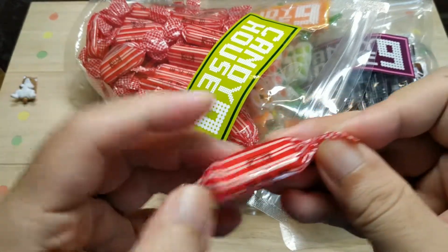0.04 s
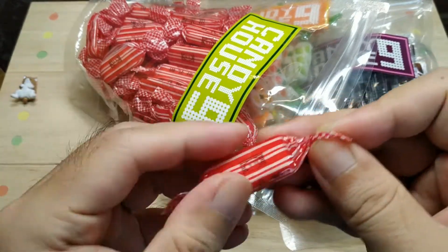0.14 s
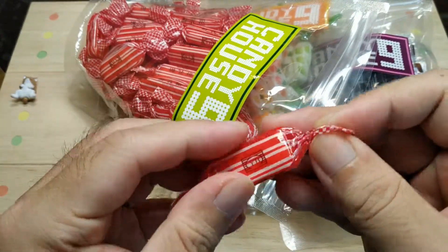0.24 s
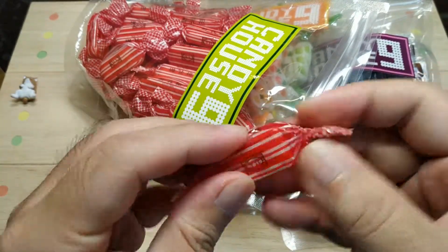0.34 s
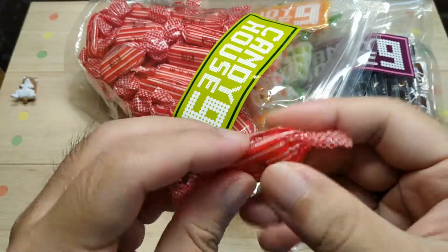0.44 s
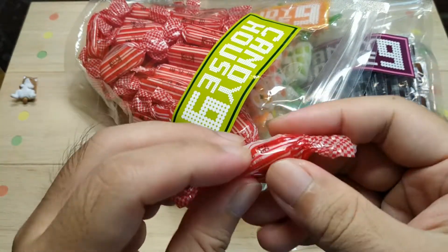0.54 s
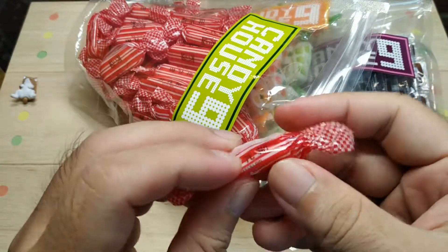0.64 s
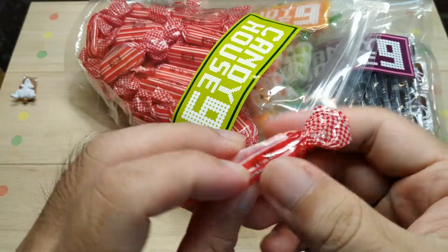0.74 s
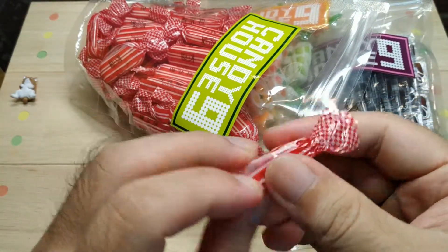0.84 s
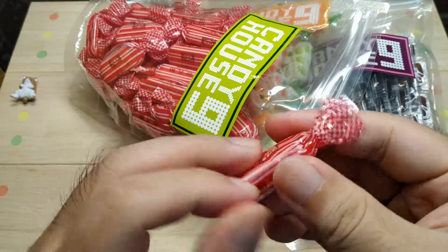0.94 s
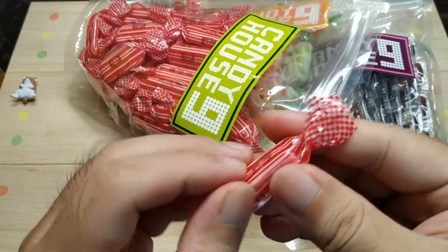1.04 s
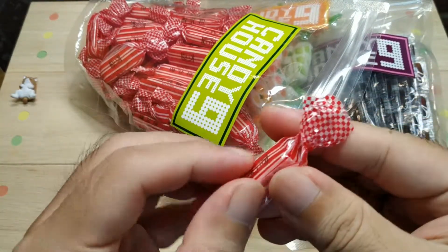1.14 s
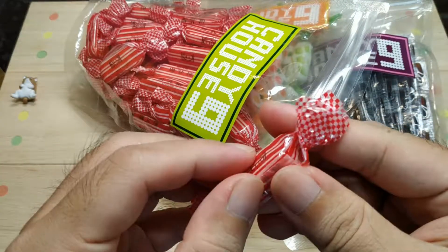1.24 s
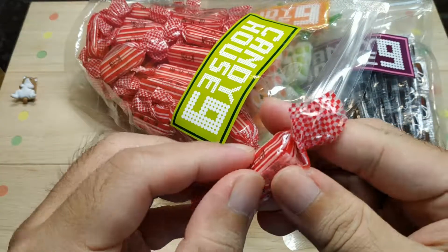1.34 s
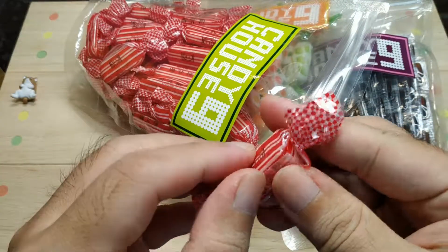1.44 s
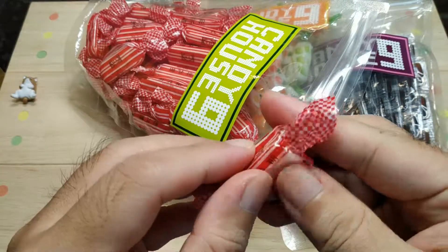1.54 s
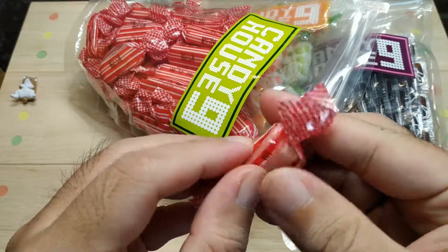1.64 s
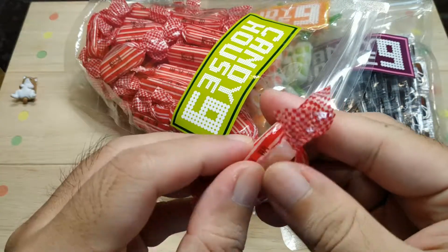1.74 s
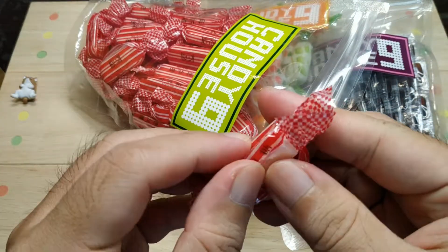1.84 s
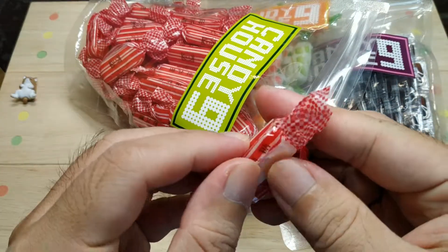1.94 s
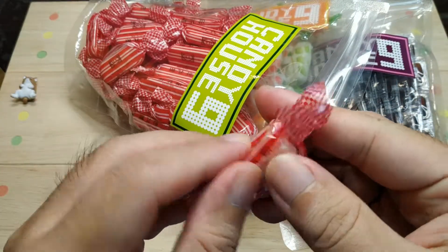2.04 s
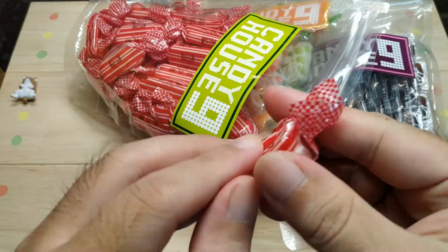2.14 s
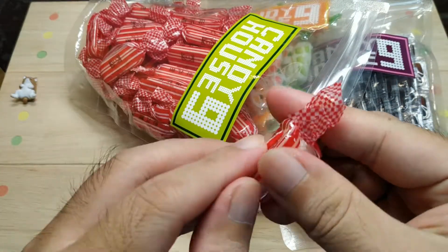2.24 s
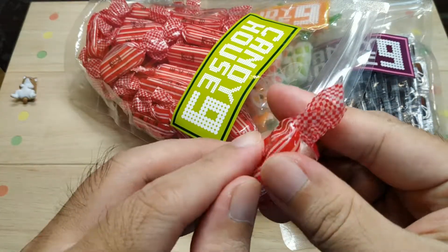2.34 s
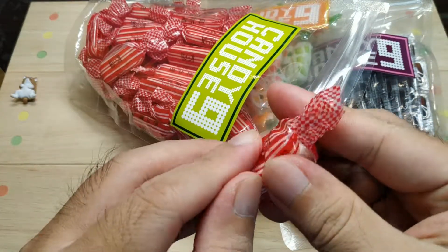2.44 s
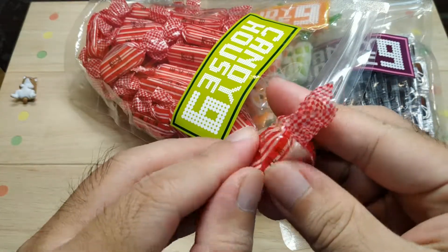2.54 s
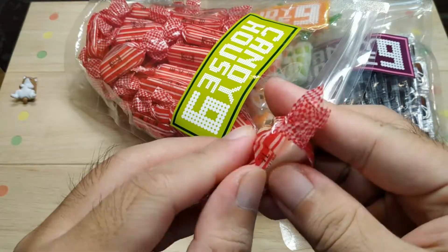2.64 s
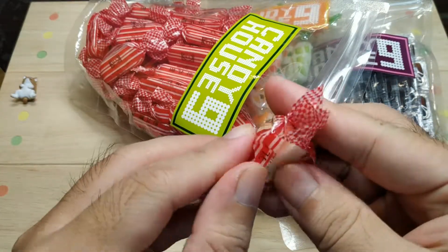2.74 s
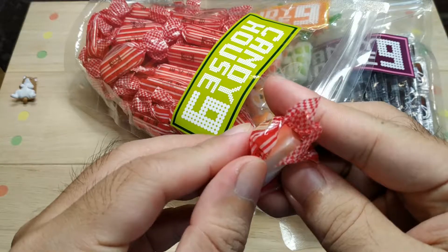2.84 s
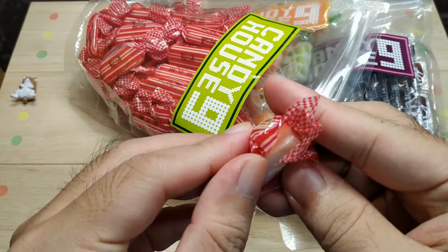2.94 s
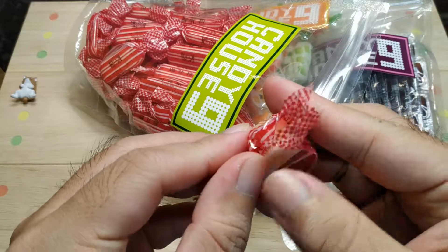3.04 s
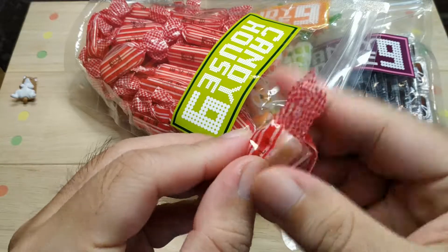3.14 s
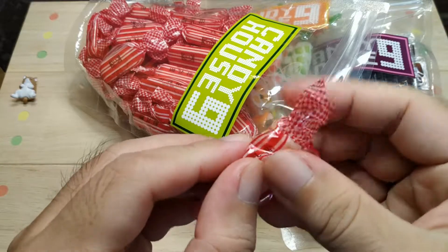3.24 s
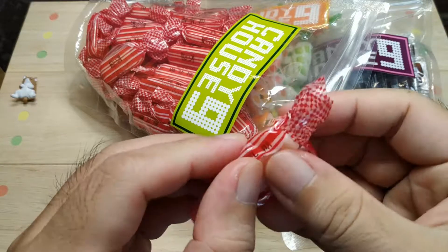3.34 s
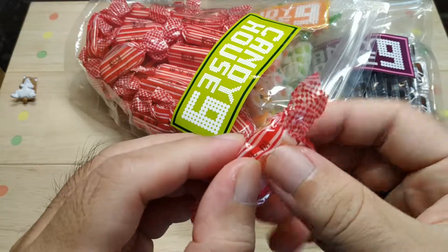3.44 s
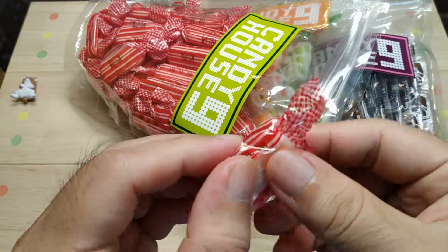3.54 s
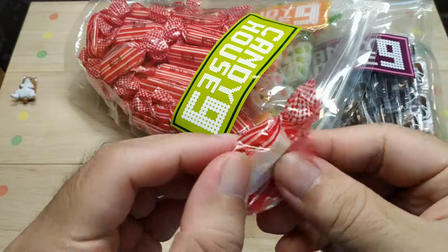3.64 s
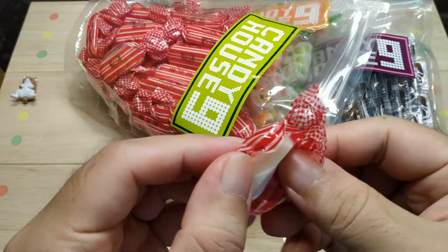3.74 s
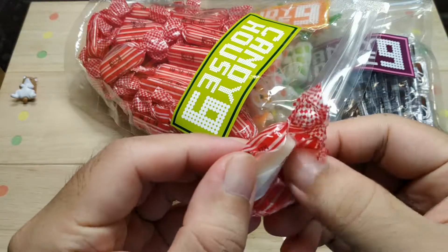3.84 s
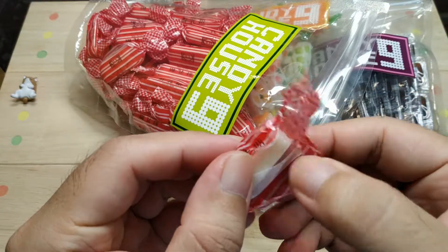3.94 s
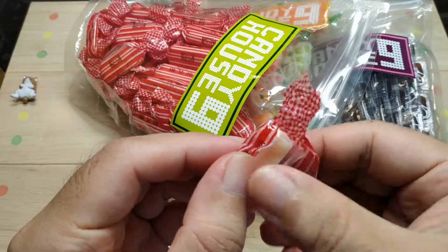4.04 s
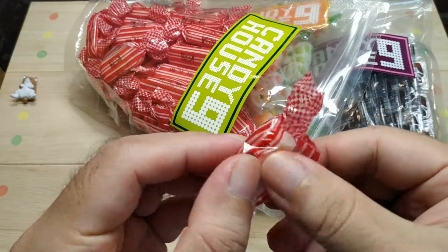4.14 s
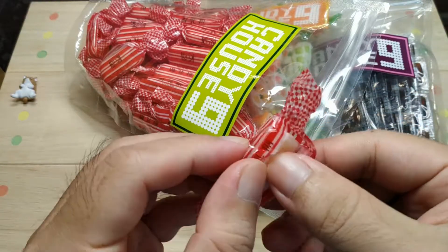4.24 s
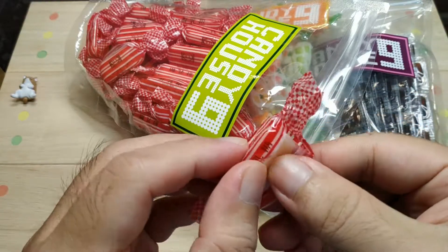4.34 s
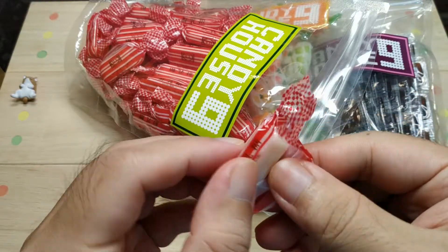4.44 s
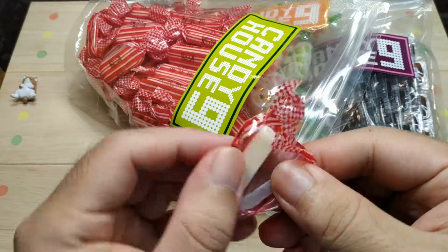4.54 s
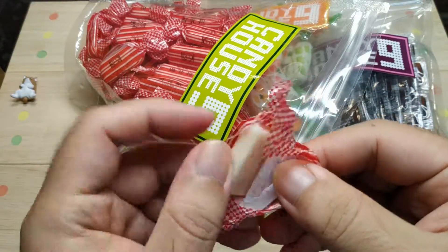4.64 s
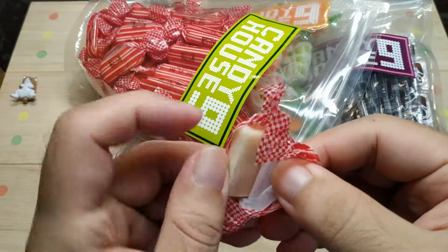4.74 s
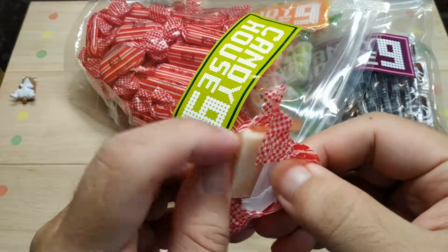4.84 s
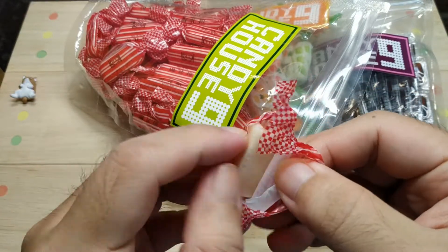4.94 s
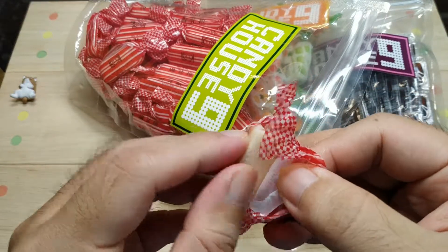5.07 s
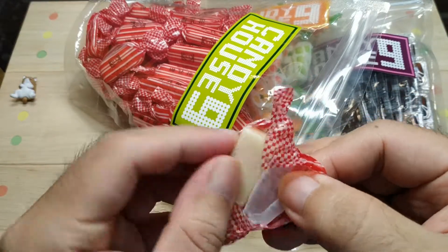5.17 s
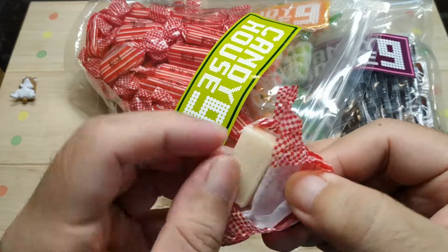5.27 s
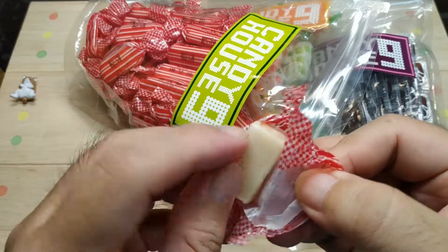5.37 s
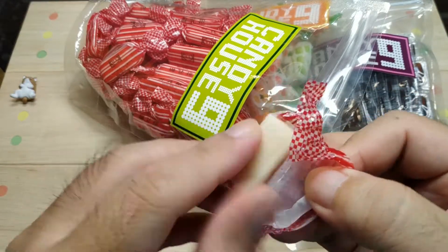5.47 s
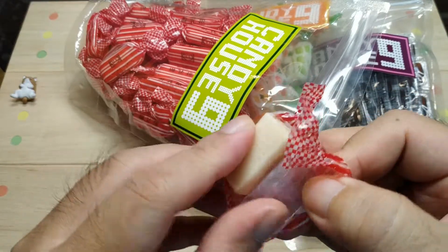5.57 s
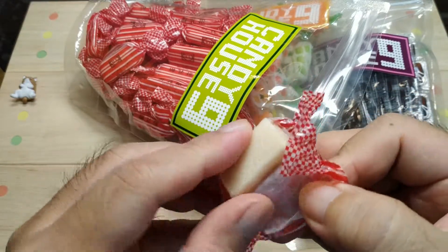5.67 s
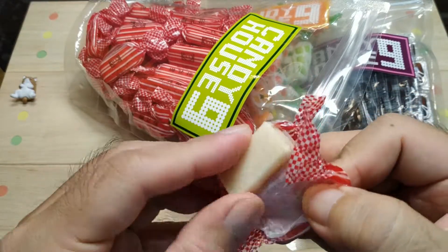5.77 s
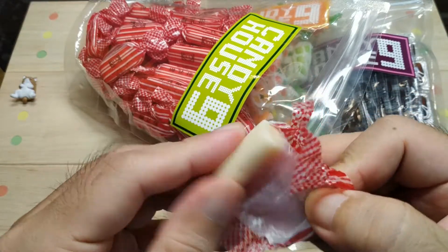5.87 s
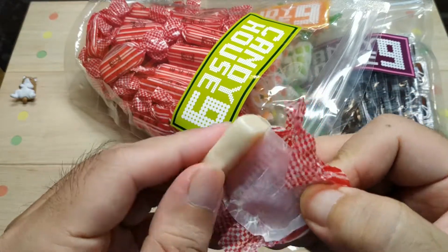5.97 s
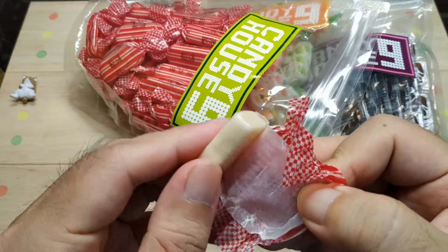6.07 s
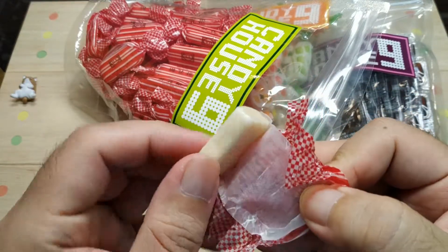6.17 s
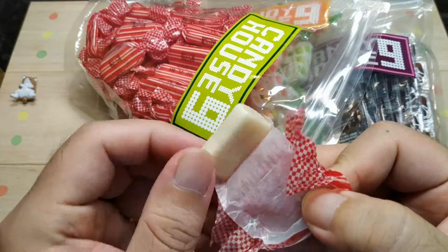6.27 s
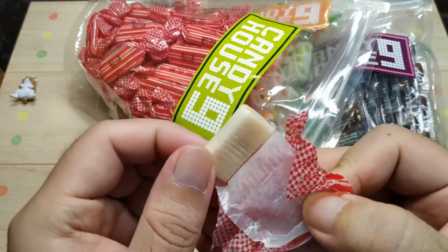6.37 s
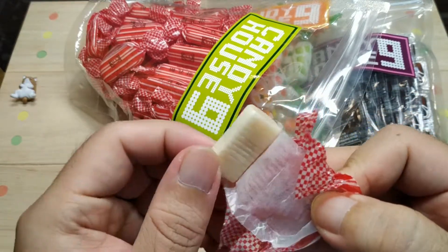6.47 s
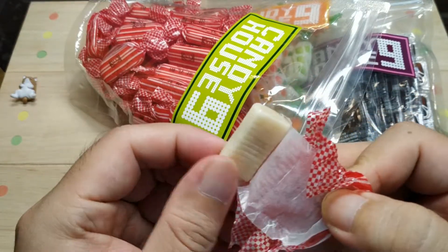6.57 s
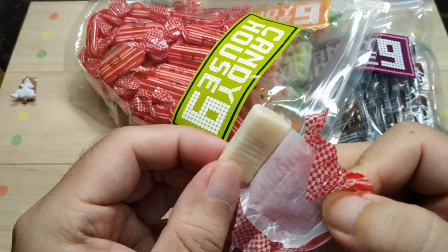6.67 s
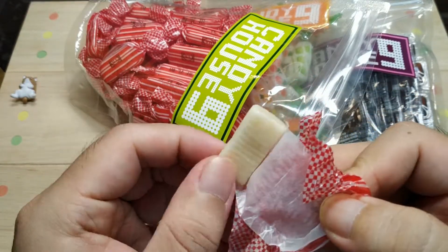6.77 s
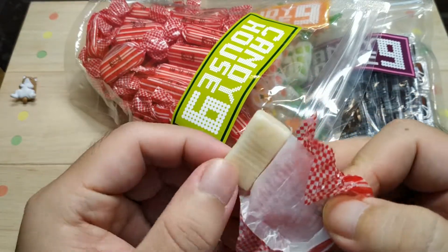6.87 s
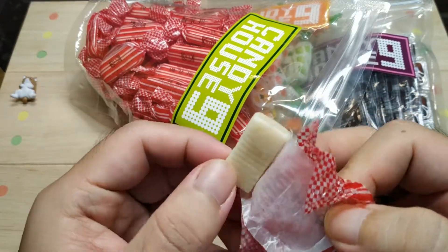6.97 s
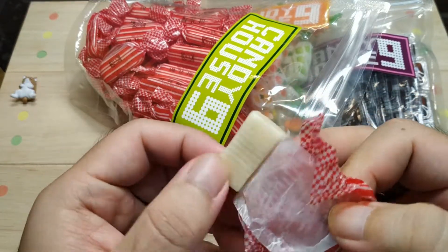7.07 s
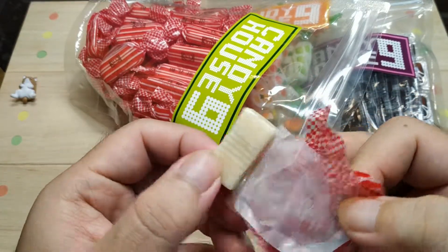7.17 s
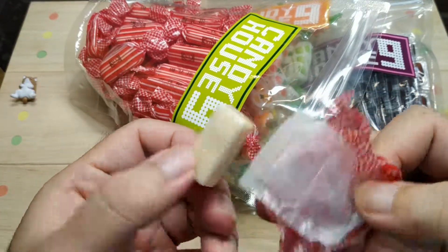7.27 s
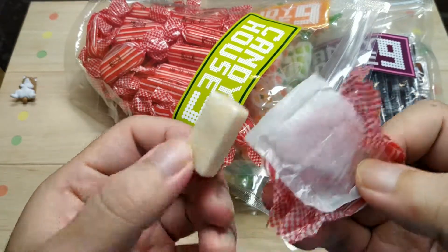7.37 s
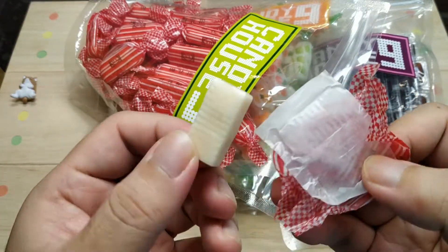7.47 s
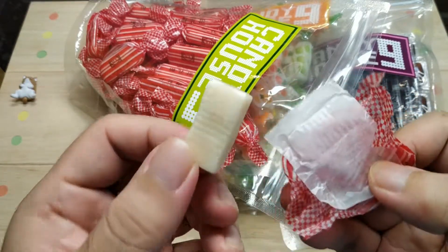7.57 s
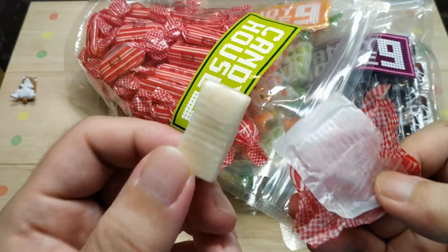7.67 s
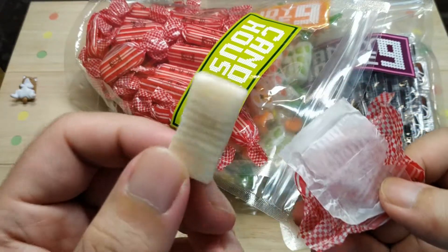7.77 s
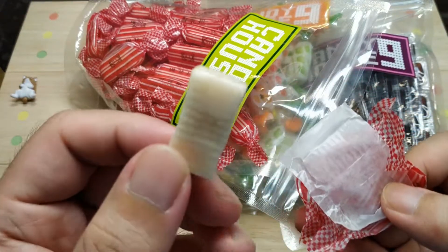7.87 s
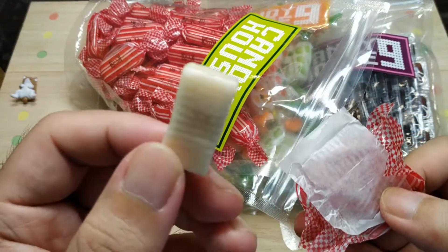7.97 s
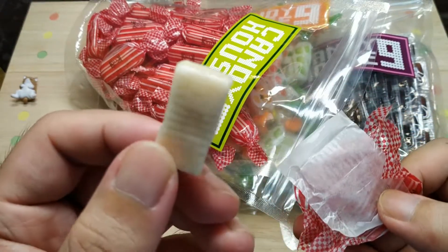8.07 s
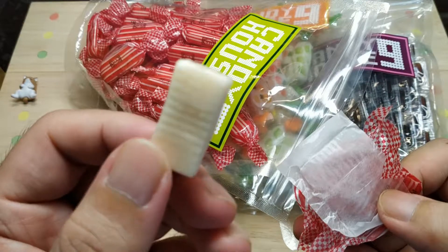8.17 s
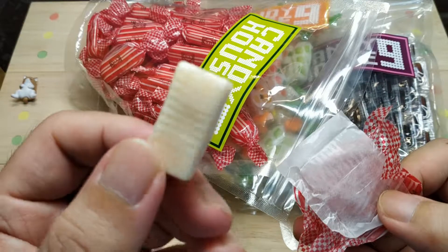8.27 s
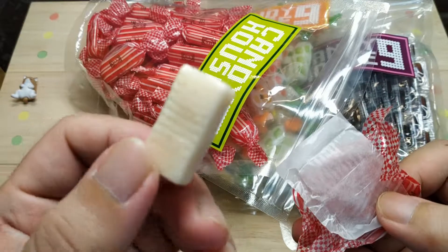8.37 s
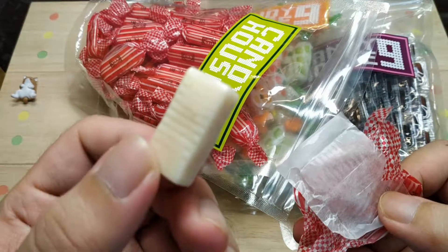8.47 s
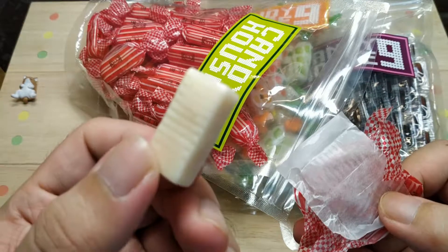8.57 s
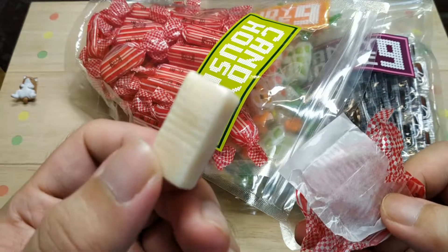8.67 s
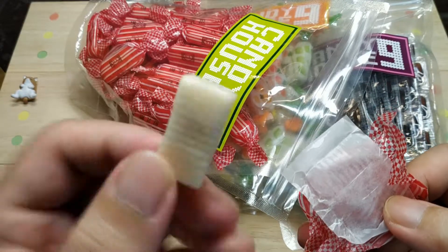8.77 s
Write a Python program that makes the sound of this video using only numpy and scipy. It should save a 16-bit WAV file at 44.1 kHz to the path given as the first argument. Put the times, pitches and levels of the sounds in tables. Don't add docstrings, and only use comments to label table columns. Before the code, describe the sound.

Close, crisp plastic film crackling and popping in irregular bursts as a sweet is unwrapped in a quiet room, with soft low air buffeting.

```python
import sys
import numpy as np
from scipy import signal
from scipy.fft import rfft, irfft
from scipy.io import wavfile
from scipy.ndimage import uniform_filter1d

SR = 44100
rng = np.random.default_rng(int(sys.argv[2]) if len(sys.argv) > 2 else 0)


def generate_wav(sig):
    pcm = np.round(np.clip(np.atleast_2d(sig).T, -1, 1) * 32767).astype(np.int16)
    wavfile.write(sys.argv[1], SR, pcm)


def how_loud(loudness_db):
    steps = np.asarray(loudness_db, float) / 20
    return 10 ** steps


N = 388521
LAG = 4
LEAD = 0.004

# pitch in Hz, level in dB per Hz.
HISS_COLOUR = [(59, -1.5), (100, -15.5), (279, -14), (577, -15.5), (1050, -16), (5320, -27.5),
               (9880, -31.5), (15100, -34.5), (16500, -71)]
# pitch in Hz, likeness from -1 to 1.
HISS_LIKENESS = [(60, 0.38), (130, 1), (290, 0.82), (640, 0.16), (1410, -0.51), (3100, 0.047)]
# pitch in Hz, level in dB.
HUM = [(120.7, -59), (184, -70)]
# time in seconds, level in dB, left over right in dB.
AIR = [(0.0, -52, -22), (0.47, -44.5, 1), (0.71, -53, -36), (0.96, -47.5, 12), (1.67, -48, -5),
       (2.99, -46, -12.5), (3.26, -56, -15.5), (3.56, -45.5, -17.5), (3.93, -48.5, -3.5), (4.17, -44, -23),
       (4.51, -45, -5), (7.6, -45.5, -9), (7.83, -43.5, -17), (8.1, -50.5, -3), (8.81, -40.5, -11.5)]
# pitch in Hz, level in dB per Hz.
GUST_COLOUR = [(8, -2.5), (25, -0.5), (50, -1.5), (100, -13), (200, -27.5), (400, -42.5), (900, -120)]
# time in seconds, peak in dB, port (0 left, 1 right).
EDDIES = [(1.092, -22.5, 0), (8.173, -25.5, 0), (0.042, -17, 1), (0.631, -20, 1), (1.028, -22.5, 1),
          (3.598, -18.5, 1), (4.023, -16, 1), (4.339, -14, 1), (4.42, -11.5, 1), (4.668, -20, 1),
          (5.987, -13, 1), (6.47, -14, 1),]
# pitch in Hz, level in dB per Hz.
FILM_COLOUR = [(1180, -40), (2000, -24), (5420, -11.5), (5980, -8.5), (11500, -4), (15200, -4.5),
               (15900, 2.5), (16500, -58)]
# pitch in Hz, width in Hz, level in dB.
BODY_TONES = [(840, 224, 0.5), (1145, 61, 8), (1702, 100, 15.5), (2570, 460, 9)]
# time in seconds, body level under the film in dB, extra level of the hollow hands in dB.
GRIP = [
    (0, -47, 7),
    (1, -29, 1),
    (2, -32, -8),
    (3, -32, -18),
    (3.8, -18, 11),
    (4.4, -23.5, -1.5),
    (4.8, -17, 11),
    (5.6, -26.5, 3.5),
    (6.4, -16, -1),
    (7.5, -21, 13),
]
# time of most pressure in seconds, crackle in dB, seconds to let go.
SQUEEZES = [(0.085, -30.5, 0.039), (0.421, -33, 0.062), (.579, -37.5, 0.096), (.8, -47, 1),
            (1.028, -38, 0.14), (1.4, -49.5, 0.89), (1.716, -41, 0.29), (2.186, -35.5, 0.039),
            (2.345, -44, 0.069), (2.479, -46, 0.12), (2.679, -45.5, 0.16), (2.926, -31.5, 0.035),
            (3.134, -41, 0.051), (3.308, -36.5, 0.089), (3.495, -38.5, 0.041), (3.78, -41.5, 0.16),
            (4.048, -36, 0.064), (4.36, -39.5, 0.16), (4.76, -39.5, 0.3), (5.034, -39.5, 0.086),
            (5.298, -37, 0.19), (5.616, -35.5, 0.19), (6, -25.5, 0.037), (6.121, -38.5, 0.1),
            (6.41, -40.5, 0.054), (7.073, -38.5, 0.13), (7.318, -36, 0.016), (7.456, -36, 0.032)]

# time in seconds, peak in dB, ring in Hz,
# body level in dB, low film level under the treble in dB.
CREASES = [(0.0507, -6.5, 7500, -48, -22), (0.0805, -9.5, 6700, -42, -14.5), (0.096, -20, 9350, -31, -18),
           (0.2613, -14, 12600, -32, -19), (0.2968, -11, 9400, -38, -16), (0.4195, -10.5, 12700, -44, -18),
           (0.4271, -13, 12600, -25, -25), (0.4474, -31, 10100, -47, -4), (0.4591, -10.5, 9100, -29, -13),
           (0.4719, -13.5, 11300, -51, -21), (0.5514, -10, 6900, -22.5, -8.5),
           (0.5745, -9.5, 7600, -34, -15), (0.5851, -12.5, 9500, -38, -14),
           (0.6454, -13.5, 11400, -27, -12), (0.6752, -12.5, 9250, -32, -8), (0.817, -7, 9100, -43, -13),
           (0.8451, -12.5, 9150, -46, -30), (0.9996, -21, 11200, -20, -29), (1.0228, -11.5, 14200, -34, -5),
           (1.11, -8.5, 9850, -38, -33), (1.1927, -16.5, 11200, -21, -14), (1.3316, -14, 11100, -45, -20.5),
           (1.5854, -14.5, 13100, -35, -14), (1.5991, -15, 7300, -35, -13),
           (1.619, -7.5, 13000, -50, -42), (1.6511, -9.5, 11000, -30.5, -28), (1.659, -14.5, 11600, -31, -18),
        (1.7074, -12.5, 9400, -35, -12), (1.714, -10, 8500, -34, -15), (1.827, -11.5, 11300, -35, -14),
        (1.8941, -8, 8950, -35, -26), (1.96, -12.5, 10400, -31, -14), (2.0045, -12.5, 9150, -48, -23),
        (2.184, -12, 9650, -29, -9.5), (2.332, -13, 8900, -30, -26), (2.3435, -12, 15100, -16.5, -24),
        (2.4734, -9.5, 10500, -22.5, -15), (2.495, -15.5, 11800, -49, -38), (2.6043, -12, 10600, -37, -21),
        (2.6643, -10, 11600, -43, -55), (2.7774, -15, 12400, -46, -17), (2.8581, -15.5, 10300, -18.5, -13),
        (2.8944, -2.5, 5800, -41, -12.5), (2.968, -16, 11900, -46, -34), (3.1097, -9.5, 11800, -51, -37),
        (3.2506, -8.5, 9900, -37, -15), (3.3, -8, 12000, -24, -16), (3.3098, -7.5, 13300, -46, -31),
        (3.324, -12.5, 10500, -32, -37), (3.4862, -10.5, 13000, -25, -32), (3.5193, -16, 14100, -21.5, -23),
           (3.6493, -4.5, 8600, -26, -18), (3.753, -10, 13200, -48, -18), (3.7774, -11.5, 10400, -41, -7),
          (3.9654, -10.5, 6100, -21.5, -13.5), (4.008, -10.5, 11900, -42, -13),
          (4.0441, -10.5, 7600, -24, -7), (4.0522, -10.5, 9600, -24.5, -10), (4.1421, -12, 13400, -23, -35),
          (4.1782, -9, 12300, -30, -16), (4.3128, -12, 11200, -18, -6), (4.3755, -16.5, 11300, -19, -11),
          (4.381, -13, 11100, -40, -11), (4.4001, -14, 11100, -38, -31), (4.485, -15, 10200, -27, -36),
          (4.5309, -10.5, 11600, -23, -34), (4.585, -15, 12300, -29.5, -14.5),
          (4.6384, -12, 8800, -45, -23), (4.653, -16, 9200, -19, -11), (4.6862, -9.5, 9200, -19.5, -12.5),
          (4.7077, -11.5, 10700, -27, -23), (4.794, -14, 11100, -26, -15), (4.82, -8, 11400, -41, -20),
          (5.0702, -6.5, 8550, -33, -24),
           (5.1153, -15.5, 13200, -36, -26), (5.1614, -13, 9500, -47, -19.5), (5.2235, -15, 11600, -31, -12),
        (5.2357, -11.5, 14000, -39, -19), (5.2814, -9.5, 14000, -22.5, -13),
        (5.2926, -16.5, 8000, -22, -25), (5.3032, -8, 11800, -29, -9), (5.5041, -12.5, 7800, -17, -4),
        (5.519, -7.5, 7500, -24, -14), (5.5798, -13.5, 14100, -19, -24), (5.5929, -7, 11000, -24, -23),
        (5.6173, -9.5, 13300, -24, -4.5), (5.667, -11, 12700, -29, -23), (5.744, -13.5, 11000, -28, -19),
        (5.8393, -13.5, 7450, -33, -7.5), (5.9991, -15, 10500, -17, 6), (6.0176, -15, 10100, -21, -4),
        (6.1195, -12, 10600, -21.5, -12), (6.2064, -11, 6750, -38, -6), (6.3589, -10.5, 14600, -28, -18),
        (6.4069, -11.5, 9900, -23, -12.5), (6.8591, -10.5, 9850, -41, -20), (6.9982, -8.5, 8650, -42, -12),
        (7.0134, -12.5, 14400, -39, -19), (7.0766, -8.5, 6270, -26, -9), (7.1343, -11.5, 9800, -39, -14)]
SETTLE = [
    (7.821, -24.5, 8800, -37, -17),
    (8.0572, -36, 9000, -30, -2),
]
# time in seconds, peak in dB, low film level under the
# treble in dB.
LESSER_CREASES = [(0.0138, -13.5, -19), (0.0686, -14.5, -21), (0.1185, -22, -24), (0.322, -22, -27),
                  (0.3441, -17.5, -11), (0.3485, -20, -20), (0.3668, -19, -13), (0.3737, -18.5, -5),
                  (0.3909, -17, -8), (0.4129, -12.5, -8), (0.5018, -15, -16), (0.5203, -18, -27),
                  (0.5266, -16, -10), (0.6122, -27, -9), (0.6358, -25.5, 5), (0.7949, -22, -20),
                  (0.8686, -23.5, 0), (0.934, -21.5, -26), (0.9477, -31, -13), (0.9702, -20.5, 3),
                  (1.0066, -38, -29), (1.0185, -12.5, -30), (1.0464, -20, -24), (1.0746, -18, -17),
                  (1.0974, -23, -3), (1.1391, -17.5, -12), (1.174, -21, -7), (1.1886, -22, -19),
                  (1.2386, -22, -14), (1.244, -15, -7), (1.2727, -22.5, -4), (1.3227, -18, -16.5),
                  (1.3616, -16, -26), (1.3877, -16.5, -13.5), (1.3965, -20.5, -19), (1.409, -23, -14),
                  (1.4374, -27, -25), (1.4587, -25, -22), (1.468, -29, -25), (1.4813, -15.5, -30),
                  (1.5122, -19.5, -11), (1.5406, -23.5, -5), (1.5475, -21.5, -19), (1.5592, -26, -37),
                  (1.5919, -21, -22),
                  (1.6026, -19, -17), (1.686, -11.5, -16), (1.7242, -22.5, 2), (1.7538, -22, -18),
              (1.782, -24, -15), (1.792, -29, -5), (1.8143, -18, -16), (1.8662, -20.5, -13),
              (1.885, -17, -13), (2.0508, -20, -20), (2.173, -20, -1.5), (2.293, -27.5, -7),
              (2.366, -22, -12), (2.42, -22, -5), (2.466, -24, -17), (2.5658, -27.5, -14),
              (2.6003, -24, -4), (2.6196, -23.5, -8), (2.63, -25, -4), (2.6837, -16, -7), (2.687, -16, -12),
              (2.6997, -18, -31), (2.724, -19.5, -12.5), (2.7494, -19, -13), (2.8021, -19.5, -13),
              (2.8256, -23, -16), (2.8514, -16, -8), (2.91, -24, 2), (2.9231, -13, -5.5), (2.938, -19, -9),
              (2.9885, -20.5, -16), (3.035, -18, -7.5), (3.0592, -22, -9), (3.0906, -23, -7),
              (3.1394, -24.5, 2), (3.1564, -24, -16), (3.2546, -26, -28), (3.2617, -18, -13),
              (3.339, -16, -22), (3.3619, -15.5, -11), (3.3683, -15, -30), (3.4317, -21.5, -8),
              (3.4365, -16, -13), (3.505, -25, -14),
                  (3.578, -27, -19), (3.6888, -19, -13), (3.7072, -22, -12), (3.7189, -16.5, -5),
                (3.7683, -24, -2), (3.782, -14.5, -16), (3.828, -13.5, -9), (3.8408, -20, -11),
                (3.857, -30, 6), (3.8714, -20.5, -11), (3.8913, -21, -3), (3.9148, -25, -22),
                (3.942, -24.5, -4), (3.9928, -11.5, -9), (4.093, -14.5, -16), (4.138, -17.5, -11),
                (4.258, -12.5, -9.5), (4.295, -25, -16), (4.344, -17, -5), (4.394, -21, -9),
                (4.414, -12, -15), (4.4593, -20.5, -21), (4.5038, -28, -32), (4.5084, -19, -7.5),
                (4.5628, -26, -11), (4.634, -20.5, -11), (4.6791, -19, -11), (4.6986, -18, -26),
                (4.7376, -14.5, -19), (4.7672, -30, 5), (4.782, -20.5, -22), (4.824, -18, -18),
                (4.8433, -30, -24), (4.8535, -21, -26), (4.8678, -12, -20), (4.886, -27, -2),
                (4.937, -30, -7), (4.9602, -24, -13), (4.996, -18, -13), (5.0055, -18, -10),
                (5.0136, -20, -10), (5.0264, -23, 1), (5.038, -23, -4), (5.0496, -24, -13),
                  (5.1474, -24.5, -11), (5.2107, -30, -22), (5.25, -20.5, 1), (5.2747, -20, -14),
              (5.3325, -17.5, -19), (5.339, -25, -28), (5.3633, -20.5, -10), (5.4431, -12, -6.5),
              (5.4651, -26, -4), (5.48, -15, -7), (5.5325, -14, -6), (5.572, -21, -20),
              (5.5837, -14.5, -12), (5.626, -12.5, -10), (5.6803, -17, -25), (5.704, -16.5, -4),
              (5.7338, -16.5, -13), (5.748, -16, -23), (5.8112, -28, -5), (5.8951, -18.5, -7),
              (5.918, -15.5, -9.5), (5.9405, -27, -21), (5.9596, -28, -3), (5.9726, -19, -22),
              (5.9915, -14.5, -4), (6.0345, -19.5, -12), (6.0434, -20, -14), (6.0988, -33, 9),
              (6.109, -19.5, -13), (6.1537, -16, -11), (6.1657, -23.5, -21), (6.2942, -29, -4),
              (6.3393, -26.5, 3), (6.3773, -19.5, -14), (6.444, -29.5, 11), (6.547, -32.5, -6),
              (6.709, -24, -9.5), (6.9002, -23.5, -9.5), (6.9574, -35, -22), (7.0284, -29, -15),
              (7.0444, -16, -13), (7.0533, -19, -6), (7.0669, -14.5, -8), (7.0953, -19, -9),
              (7.1032, -14, -13), (7.1394, -26, -19), (7.1714, -23, -12.5), (7.2153, -20, -18),
              (7.2463, -17, -8), (7.286, -24, -19), (7.3039, -16, -4.5), (7.3191, -11, -11),
              (7.3847, -18.5, -24), (7.449, -23, 4), (7.4804, -16.5, -10.5)]
STRAY_TICKS = [
    (6.513, -32.5, 2),
    (6.6796, -31, -12),
    (6.75, -28.5, -12),
    (7.376, -28, -20),
]
# pitch in Hz, seconds to fall by 60 dB.
ROOM_DECAY = [(500, 0.33), (8000, 0.17), (15000, 0.1)]


def evened(x):
    return x / np.sqrt(np.mean(x ** 2) + 1e-20)


def read(points, hz):
    table_hz, value = np.transpose(points)
    return np.interp(np.log(hz + 1), np.log(table_hz + 1), value)


def curve(rows):
    s, *columns = np.transpose(rows)
    t = np.arange(N) / SR
    return [np.interp(t, s, column) for column in columns]


def coloured(x, points):
    size = x.shape[-1]
    hz = np.fft.rfftfreq(size, 1 / SR)
    return irfft(rfft(x) * how_loud(read(points, hz)), size)


def slow(rate_hz):
    hz = np.fft.rfftfreq(N, 1 / SR)
    spectrum = rfft(rng.standard_normal(N))
    return evened(irfft(spectrum / (1 + (hz / rate_hz) ** 4), N))


def background():
    hz = np.fft.rfftfreq(N, 1 / SR)
    left, other = rfft(rng.standard_normal((2, N)))
    same = np.clip(read(HISS_LIKENESS, hz), -1, 1)
    right = same * left + np.sqrt(1 - same ** 2) * other
    hiss = evened(irfft(np.array([left, right]) * how_loud(read(HISS_COLOUR, hz)), N))
    t = np.arange(N) / SR
    hum = np.zeros(N)
    for tone_hz, db in HUM:
        level = how_loud(db + 1.5 * slow(2))
        hum += level * np.sin(2 * np.pi * tone_hz * t + 0.6 * slow(1.5))
    hiss_db = -56 + np.array([[1.5], [3.5]])
    hum_db = np.array([[2.5], [4.5]])
    return hiss * how_loud(hiss_db) + hum * how_loud(hum_db)


def air():
    level_db, pan_db = curve(AIR)
    lumps = how_loud(4.5 * np.array([slow(10), slow(10)]))
    gusts = evened(coloured(rng.standard_normal((2, N)), GUST_COLOUR) * lumps)
    out = gusts * how_loud(level_db + 4.0 + np.array([pan_db, -pan_db]) / 2)
    u = np.arange(-600, 600) / SR / 0.0026
    push_pull = -u * np.exp(-u ** 2)
    for s, db, port in EDDIES:
        at = round(s * SR)
        out[int(port > 0.5), at - 600:at + 600] += how_loud(db - 3.5) * push_pull
    return out


def causal(gain, size):
    folded = irfft(np.log(gain), size)
    first_half = np.arange(size) < size / 2
    return gain * np.exp(1j * rfft(2 * folded * first_half).imag)


def film_snap(noise, ring_hz, low_db, shiver_db, patchy_db):
    size = noise.shape[1]
    t = np.arange(size) / SR - LEAD
    hz = np.fft.rfftfreq(size, 1 / SR)
    alike = 0.5
    pair = alike * noise[0] + np.sqrt(1 - alike ** 2) * noise[1:3]
    ring = 6.5 * np.exp(-(np.log((hz + 1) / ring_hz) / 0.1) ** 2)
    faces = evened(uniform_filter1d(uniform_filter1d(noise[4, :len(hz)], 24), 24))
    colour = causal(how_loud(read(FILM_COLOUR, hz) + ring) * how_loud(patchy_db * faces), size)
    spike = np.exp(-(t / np.where(t > 0, 0.00035, 0.00012)) ** 2)
    shiver = how_loud(shiver_db - 60 * np.where(t > 0, t / 0.02, 0.19 - t / 0.016))
    low = 1 / (1 + (hz / 5000) ** 8)
    dull = irfft(rfft(pair * (0.3 * spike + shiver)) * colour * low, size)
    bright = irfft(rfft(pair * (spike + shiver)) * colour * (1 - low), size)
    return bright / np.linalg.norm(bright) + how_loud(low_db) * dull / np.linalg.norm(dull)


def body_knock(noise, hollow_db, patchy_db):
    size = noise.shape[1]
    t = np.arange(size) / SR - LEAD
    hz = np.fft.rfftfreq(size, 1 / SR)
    retune = 1 + 0.05 * noise[4, -5]
    modes = np.zeros(len(hz))
    for (tone_hz, width_hz, db), chance in zip(BODY_TONES, noise[4, -4:]):
        tone_hz = tone_hz * retune
        level = how_loud(db + patchy_db * chance + hollow_db * (tone_hz < 1000))
        modes += level / (1 + ((hz - tone_hz) / width_hz) ** 2)
    swell = how_loud(-60 * np.where(t > 0, t / 0.022, -t / 0.0054))
    return irfft(rfft(noise[3]) * modes, size) * swell


def burst(noise, ring_hz, body_db, low_db, hollow_db=0, shiver_db=-9, patchy_db=4):
    film = film_snap(noise, ring_hz, low_db, shiver_db, patchy_db)
    knock = body_knock(noise, hollow_db, patchy_db)
    return film / np.linalg.norm(film) + how_loud(body_db) * knock / np.linalg.norm(knock)


def ports(pair, pan_db):
    left = np.roll(pair[0], LAG) * how_loud(pan_db / 2)
    right = pair[1] * how_loud(-pan_db / 2)
    return np.array([left, right])


def pressure_db():
    s, db, let_go_s = np.transpose(SQUEEZES)[:, :, None]
    t = np.arange(0, N + 64, 64) / SR
    press_s = 0.69 * let_go_s
    away = np.where(t > s, (t - s) / let_go_s, (s - t) / press_s)
    level = np.maximum((db - 11 * away).max(0), -60.5)
    return np.interp(np.arange(N) / SR, t, level)


def crackle():
    level_db = pressure_db()
    body_db, _ = curve(GRIP)
    busy = how_loud(0.3 * (level_db + 38))
    chance = 480 * busy * np.exp(0.8 * slow(40)) / SR
    strength = how_loud(4 * np.minimum(rng.exponential(1, N), 2.6))
    size = strength * (rng.random(N) < chance) / np.sqrt(busy)
    kinds = 24
    kind = rng.integers(0, kinds, N)
    draws = rng.random((kinds, 2))
    film = np.zeros((2, N))
    for k in range(kinds):
        ring_hz = 4500 * 2.96 ** draws[k, 0]
        low_db = -22 + 12 * rng.random()
        grain = burst(rng.standard_normal((5, 768)), ring_hz, -71, low_db, shiver_db=-12)
        grain = ports(grain, -4.5 + 6 * (draws[k, 1] - 0.5))
        train = size * (kind == k)
        film += signal.oaconvolve(train[None], grain, axes=1)[:, :N]
    knock = burst(rng.standard_normal((5, 768)), 9000, 50.0, 0)[0]
    body = evened(signal.oaconvolve(size, knock)[:N]) * how_loud(body_db - 12.0)
    moving = np.clip((7.508 - np.arange(N) / SR) / 0.037, 0, 1)
    return (evened(film) + ports([body, body], -21.5)) * how_loud(level_db + 5.5) * moving


def snaps():
    ticks = LESSER_CREASES + STRAY_TICKS
    grip_db, hollow_db = curve(GRIP)
    lesser = []
    for (s, db, low_db), chance in zip(ticks, rng.random(len(ticks))):
        ring_hz = 7000 * 1.87 ** chance
        lesser.append((s, db, ring_hz, grip_db[round(s * SR)] - 2.5, low_db))
    rows = CREASES + lesser + SETTLE
    out = np.zeros((2, N + 2048))
    noise = rng.standard_normal((len(rows), 5, 1024))
    places = rng.random(len(rows))
    for (s, db, ring_hz, body_db, low_db), z, place in zip(rows, noise, places):
        at = max(round((s - LEAD) * SR), 0)
        pan_db = -5.5 + 11 * (place - 0.5)
        pair = ports(burst(z, ring_hz, body_db, low_db, hollow_db[at]), pan_db)
        peak = abs(signal.hilbert(pair.mean(0))).max()
        out[:, at:at + 1024] += how_loud(db + 1.0) * pair / peak
    return out[:, :N]


def room(x):
    taps = np.zeros((6, SR // 2))
    at = np.arange(120, SR // 2 - 20, 20) + rng.integers(0, 20, (6, (SR // 2 - 121) // 20))
    np.put_along_axis(taps, at, rng.choice([-1., 1.], at.shape), 1)
    hz, t, z = signal.stft(taps, SR, nperseg=256)
    fall = how_loud(-60 * t / read(ROOM_DECAY, hz)[:, None])
    tails = signal.istft(z * fall, SR, nperseg=256)[1]
    turn = np.arange(N) // 700 % 3
    out = np.zeros((2, N))
    for k in range(3):
        fed = x.mean(0) * (turn == k)
        out += signal.fftconvolve(fed[None], tails[2 * k:2 * k + 2], axes=1)[:, :N]
    return out / np.linalg.norm(tails[0])


def thump(s=6.4066, db=-27, width_s=0.00049):
    u = (np.arange(N) / SR - s) / width_s
    return how_loud(db) * -u * np.exp(-u ** 2)


def scene():
    surroundings = background() + air()
    wrapper = crackle() + snaps() + thump()
    return surroundings + wrapper + how_loud(-10.5) * room(wrapper)


def top_cut(x):
    return signal.sosfilt(signal.butter(12, 17010, fs=SR, output="sos"), x)


def record(dry):
    edge = signal.firwin(127, 15950, window=("kaiser", 3), fs=SR)
    flattened = np.clip(dry, -0.8, 0.8)
    mix = signal.oaconvolve(flattened, edge[None], "same", axes=1)
    return top_cut(mix)


dry = scene()
out = record(dry)
generate_wav(out)
```